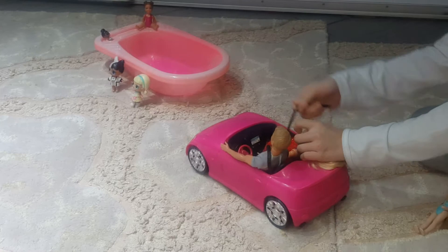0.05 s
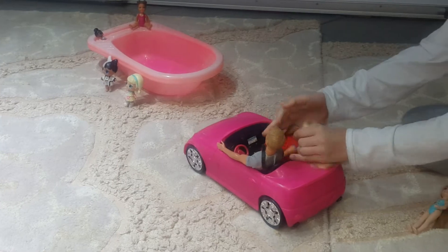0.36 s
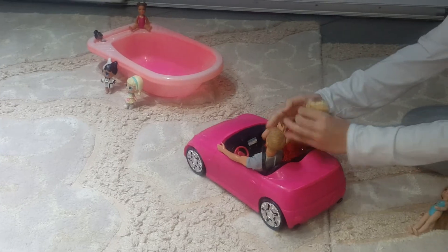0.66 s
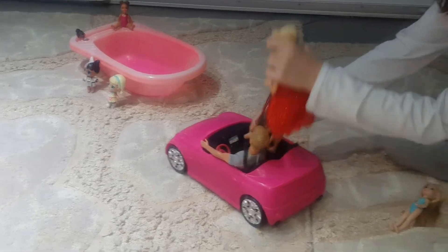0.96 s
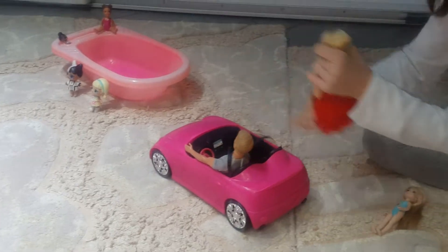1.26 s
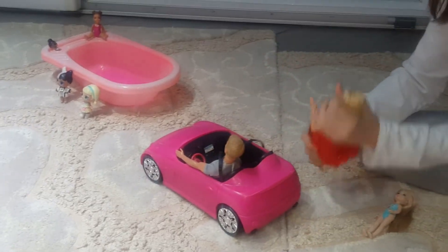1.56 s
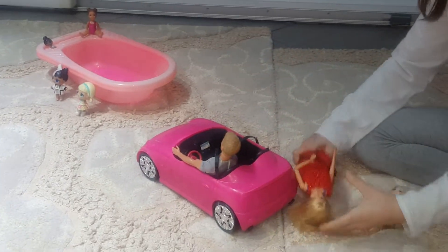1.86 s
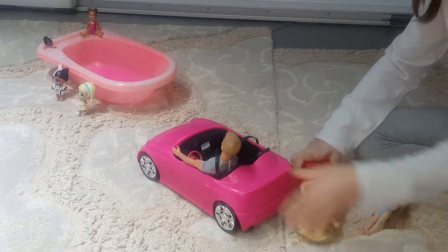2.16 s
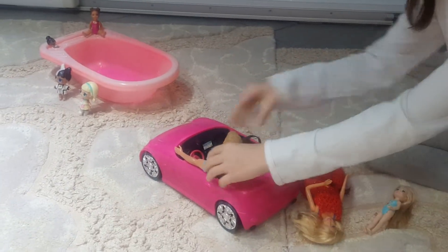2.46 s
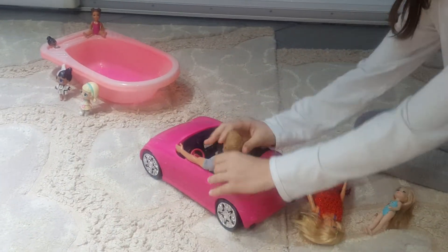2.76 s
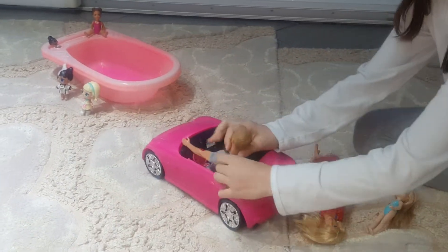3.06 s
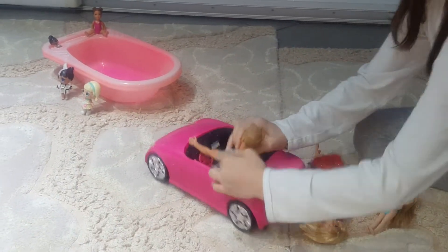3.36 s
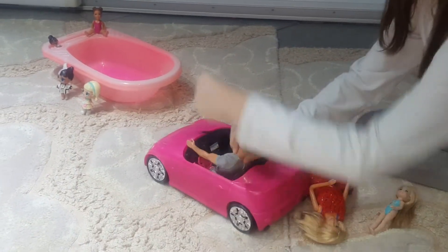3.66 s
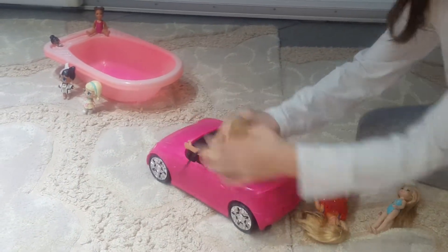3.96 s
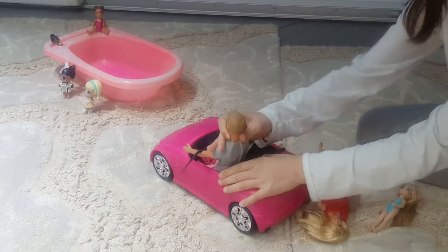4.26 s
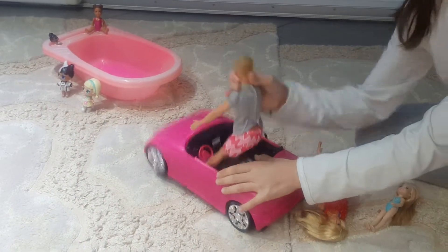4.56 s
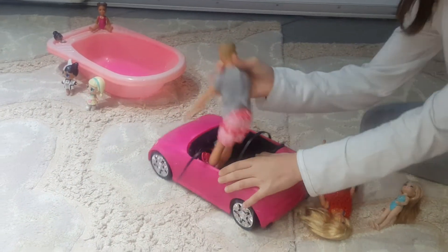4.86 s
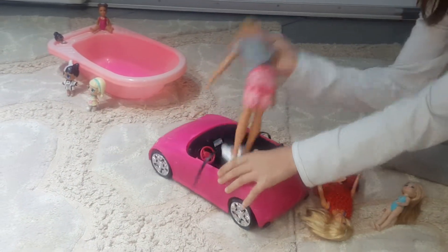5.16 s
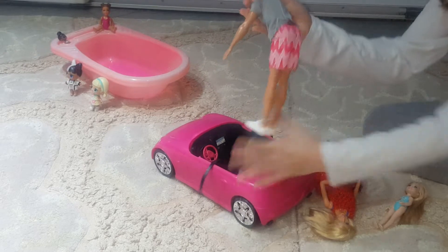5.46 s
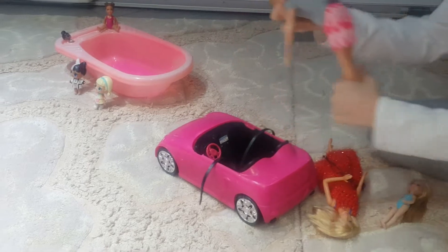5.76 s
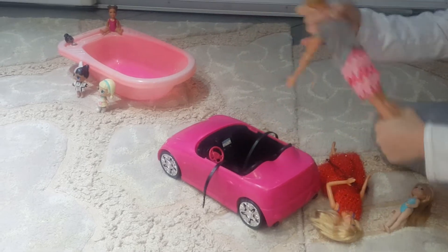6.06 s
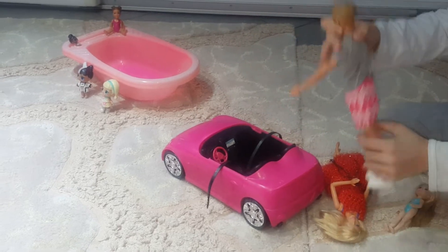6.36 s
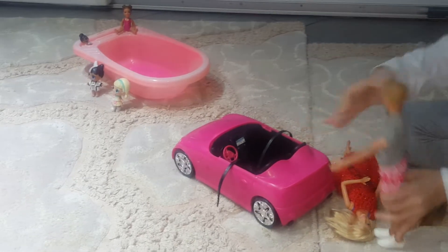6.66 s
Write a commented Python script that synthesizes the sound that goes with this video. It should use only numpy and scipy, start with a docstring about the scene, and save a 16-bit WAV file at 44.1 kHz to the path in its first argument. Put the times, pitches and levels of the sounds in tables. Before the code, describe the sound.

Plastic dolls knock, click and scrape against a hollow toy car as hands move them about in a small room.

```python
"""Stiff plastic dolls knock and clatter against a hollow toy car as they are lifted out of it.
Each impact excites damped modes of shell and limb; the harder the contact, the brighter the sound.
Joints and fingernails tick, one joint snaps, and friction makes plastic scrape and hair and sleeves
rustle. The car stands on a carpet in a small room that reflects the knocks; far behind, an appliance
hums with the slow beat of its motor against the mains."""
import sys
import numpy as np
from scipy import signal
from scipy.io import wavfile

SR = 44100
rng = np.random.default_rng(int(sys.argv[2]) if len(sys.argv) > 2 else 0)


def generate_wav(sig):
    """Save sig (samples, or channels by samples) to the path in sys.argv[1] as 16-bit PCM at SR."""
    pcm = np.round(np.clip(np.atleast_2d(sig).T, -1, 1) * 32767).astype(np.int16)
    wavfile.write(sys.argv[1], SR, pcm)


N = 295646
TIME = np.arange(N) / SR
RING = np.arange(SR // 15) / SR   # time axis of one impact [s]
CUTOFF_HZ = 15900

# strong modes of the car's shell: (frequency [Hz], level [dB])
SHELL_MODES = [(125, -10), (265, -6), (328, -13), (409, 0.5), (458, -7), (530, -7), (572, 1), (602, 3),
               (700, -4), (781, -1.5), (856, -20.5), (935, 3), (1073, -3), (1170, -6), (1291, -5),
               (1376, -5), (1520, -5), (1674, -5), (1776, -5.5), (1900, -5.5), (2055, -1.5), (2480, -2),
               (2637, -0.5), (2762, -9), (2900, -2.5), (3182, -23), (3494, -14.5)]
# registers of thud, shell, clack and click: (lower edge [Hz], decay time T60 [s], gain [dB])
MODE_REGISTERS = [(100.3, 0.11, -2), (480, 0.045, -0.1), (900, .028, 0.5), (2000, 0.021, 2.26)]
# big low panels set the whole body thudding: (panel frequency [Hz], level re shell [dB])
BODY_THUD = [(545, -4), (615, -10.5)]
# crowded upper modes, heard as a noisy snap: (frequency [Hz], spectral density [dB])
SNAP_SPECTRUM = [(3000, -9.5), (4300, 1), (5500, 6), (6800, -2.5), (8200, 1), (10000, -9), (13000, -3.5),
                 (16000, -11.5)]
# plastic sliding on plastic: (frequency [Hz], spectral density [dB])
SKID_SPECTRUM = [(900, -9.5), (1300, 6.5), (2000, 5.5), (3000, -0.5), (4500, -10.5), (6000, -20.5)]


def knocks(gain_db=-0.68, snap_db=-1.5, skid_db=-7.0, detune=0.029, focus_octaves=0.25):
    """Impact excitation: shell and limb ring; a soft contact is too slow to drive the high modes."""
    shell_hz, shell_mode_db = np.transpose(SHELL_MODES)
    upper_hz = np.geomspace(2200, 5000, 22)
    mode_hz = np.r_[shell_hz, upper_hz]
    mode_db = np.r_[shell_mode_db, at_hz([(2000, -8), (3400, -5), (5000, -8)], upper_hz)]
    register = np.digitize(mode_hz, [row[0] for row in MODE_REGISTERS[1:]])
    snap_noise, skid_noise = coloured(SNAP_SPECTRUM, size=SR), coloured(SKID_SPECTRUM, size=SR)
    out = np.zeros((2, N))
    for s, shell_db, limb_db, hardness, panel_hz in contacts():
        hz = mode_hz * (1 + detune * rng.standard_normal(len(mode_hz)))   # the grip shifts the modes
        limb_hz = max(3300 * 2 ** (hardness / 8), 1750)   # harder blows favour a higher limb resonance
        focus_db = sum(lift_db * np.exp(-(np.log2(hz / centre) / focus_octaves) ** 2)
                       for centre, lift_db in ((panel_hz, 7.0), (limb_hz, 4.0)))
        tilt_db = 0.54 * hardness * np.log2(np.maximum(hz / 1600, 1))   # acts above 1600 Hz
        db = mode_db + focus_db + tilt_db
        thud_db = shell_db + at_hz(BODY_THUD, panel_hz)
        clack_db = limb_db - hardness
        click_db = limb_db + 1.5 + 0.24 * hardness
        softness = np.clip((-hardness - 6.5) / 10, 0, 1)   # glancing touches build up slowly
        for k, level_db in enumerate((thud_db, shell_db, clack_db, click_db)):
            edge_hz, t60, register_db = MODE_REGISTERS[k]
            rise = 0.55 + 3.22 * softness * edge_hz / 1000
            ring = damped_modes(hz[register == k], db[register == k], t60, rise_cycles=rise)
            add(out, s, from_db(level_db + register_db) * ring)
        add(out, s, from_db(limb_db + hardness + snap_db) * snap(snap_noise))
        add(out, s, from_db((clack_db + click_db) / 2 + skid_db) * skid(skid_noise))
    return from_db(gain_db) * out


# a limb meets the car:
# (time [s], shell level [dB], limb level [dB], hardness as treble lift [dB], panel frequency [Hz])
IMPACTS = [(0.0316, -23.5, -36, -6, 743), (.057, -26, -35.5, -6.5, 686), (.0843, -26.5, -42.5, -6, 640),
           (0.357, -45, -63, -0.5, 640), (.457, -57, -50.5, -10.5, 900), (0.4814, -48, -45, -4, 580),
           (0.8636, -32, -38.5, -6.5, 900), (0.9069, -38, -49, -4, 590), (0.9208, -30.5, -42.5, -1, 620),
           (1.0785, -53, -64.5, -7, 596), (1.116, -46.5, -69.5, -10, 560), (1.9387, -32.5, -52, -8, 580),
           (2.6287, -48, -65, -13, 554), (2.7341, -40.5, -57, -13, 680), (2.829, -43.5, -58.5, -4, 604),
           (2.9727, -48, -56, -11.5, 810), (3.178, -49.5, -68.5, -13, 780), (3.336, -45, -64.5, -11, 560),
           (3.4556, -30.5, -44.5, -4, 483), (3.462, -31, -49, -11.5, 540), (3.5375, -36.5, -41, -5, 555),
           (3.574, -41.5, -46, 3, 575), (3.657, -40.5, -65.5, -15.5, 620), (3.6986, -44, -55, -11, 710),
           (3.7211, -34, -40.5, -6, 640), (3.8853, -36, -49, -8.5, 670), (4.0194, -35.5, -47, -7, 606),
           (4.062, -37, -61.5, -14.5, 560), (4.338, -42.5, -60, -14.5, 579),
           (4.3621, -48.5, -53.5, -5.5, 520), (4.538, -24, -27.5, 0.5, 620), (4.5445, -29.5, -35, 1, 540),
           (4.560, -22, -38.5, -10, 560), (4.593, -24, -25.5, -3.5, 900), (4.605, -32, -27, -1.5, 550),
           (4.6225, -24, -30, 3.5, 587), (4.629, -22, -33.5, -9.5, 565), (4.657, -33, -51, 7, 604),
           (4.837, -44, -44.5, -0.5, 613), (4.9523, -41, -44.5, -10, 900), (4.9748, -33, -44, -10, 620),
           (4.991, -32, -41.5, -2, 910), (5.023, -48, -49, -5.5, 555), (5.1439, -51, -49.5, -10, 556),
           (5.163, -34.5, -39, -4, 545), (5.2061, -31, -35.5, -1.5, 630), (5.3643, -50, -55.5, 0, 610)]


def contacts(rebound_s=.007, spread=0.3005):
    """Inelastic collision: each limb lands, then lands again, weaker and softer."""
    delays = rebound_s * (1 + spread * rng.uniform(-1.002, 1, len(IMPACTS)))
    for (s, shell_db, limb_db, hardness, panel_hz), delay in zip(IMPACTS, delays):
        yield s, shell_db, limb_db, hardness, panel_hz
        yield s + delay, shell_db - 12, limb_db - 10, hardness - 1.5, panel_hz


def damped_modes(hz, level_db, t60, scatter_db=3.0, apart_hz=4500, rise_cycles=0.65):
    """Modal superposition: one blow starts decaying sinusoids, each with its own strength."""
    strength, split, sign = rng.standard_normal((3, len(hz), 1))
    hz = hz[:, None]
    # short waves reach the two sides out of step
    phase = np.minimum(hz / apart_hz, 1) * split * np.array([1, -1])[:, None, None]
    amplitude = np.sign(sign) * from_db(level_db[:, None] + scatter_db * strength)
    waves = amplitude * np.sin(2 * np.pi * hz * RING + phase)
    onset = 1 - np.exp(-(RING * hz.mean() / rise_cycles) ** 2)   # low registers build up more slowly
    return unit_attack(waves.sum(1) * onset * decay(t60))


def snap(noise, t60=0.039, spike=1.2, spike_s=0.00051):
    """Modal overlap: crowded high modes merge into noise, with a spike at the instant of contact."""
    return burst(noise, decay(t60) + spike * np.exp(-RING / spike_s))


def skid(noise, length_s=.016, slip_s=0.0021, count=6):
    """Stick-slip friction: the limb skids on in tiny slips, each weaker the later it comes."""
    slips = rng.uniform(0, length_s, (count, 1))
    since = RING - slips
    pulses = (since > 0) * np.exp(-np.abs(since) / slip_s - slips / length_s)
    return burst(noise, pulses.sum(0))


# modes of a doll's limb: (frequency [Hz], level [dB])
LIMB_MODES = [(600, -9), (930, -9.5), (1500, -17), (2185, 0.5), (2320, -1.5), (2425, -20), (2950, -22),
              (3400, -10), (3790, -13), (4050, -2), (4720, -4.5), (5195, -9), (6100, -20), (6820, -16),
              (8150, -12)]
# the crack of its joint: (frequency [Hz], spectral density [dB])
CRACK_SPECTRUM = [(700, -19), (1500, -14), (2500, 3.5), (4500, -5.5), (8000, -3), (11000, -19),
                  (15000, -31)]


def joint(s=1.327, level_db=-36, crack_db=-1.0, rebound_s=.006, rebound_db=-8):
    """Elastic release: a stiff joint snaps over and rebounds, ringing a limb that the hand damps."""
    out = np.zeros((2, N))
    hz, db = np.transpose(LIMB_MODES)
    noise = coloured(CRACK_SPECTRUM, size=SR)
    for delay, loss_db in ((0, 0), (rebound_s, rebound_db)):
        ring = damped_modes(hz, db, t60=0.02, scatter_db=0.0)
        crack = from_db(crack_db) * burst(noise, decay(t60=0.011))
        add(out, s + delay, from_db(level_db + loss_db) * (ring + crack))
    return out


# ticks of joints and fingernails: (time [s], level [dB], centre frequency [Hz])
SMALL_TICKS = [(1.435, -52, 2980), (1.443, -56.5, 6850), (1.574, -54.5, 3160), (1.658, -56.5, 2700),
               (3.849, -54.5, 4970), (4.414, -58, 9000), (4.448, -57.5, 8850), (5.040, -51, 5600),
               (5.119, -46.5, 9500), (5.408, -60, 2960), (5.441, -57, 3530), (5.870, -63.5, 8950),
               (6.602, -64.5, 8900)]


def ticks(t60=0.0074, gain_db=-4, edge_ratio=1.64, faint_per_s=1.5, faint_db=-69, faint_hz=(2980, 10000)):
    """Damped resonance: small stiff parts give a tiny burst in one broad band, faint ones at random."""
    out = np.zeros((2, N))
    chance = rng.random((round(faint_per_s * N / SR), 2))
    faint = [(when * N / SR, faint_db, np.interp(pitch, [0, 1], faint_hz)) for when, pitch in chance]
    for s, level_db, centre_hz in SMALL_TICKS + faint:
        pulse = rng.standard_normal((2, len(RING))) * decay(t60)
        tick = band_pass(pulse, centre_hz / edge_ratio, min(centre_hz * edge_ratio, CUTOFF_HZ))
        add(out, s, from_db(level_db + gain_db) * unit_attack(tick))
    return out


# limbs slip along the shell: (time [s], half-width [s], level [dB])
LIMB_SCRAPES = [(.858, 0.0076, -48), (.895, .015, -57), (4.014, 0.0082, -53), (4.075, .02, -51),
                (4.345, 0.02, -58), (4.988, 0.015, -37), (5.108, 0.022, -51)]


def scrapes(judder_db=2.5):
    """Stick-slip friction: plastic drags over plastic in quick, uneven catches."""
    judder = from_db(judder_db * (drift(700) - 0.5))
    return swells(LIMB_SCRAPES) * judder * coloured(SKID_SPECTRUM)


# hands grip, tug or drag a toy: (start [s], duration [s], rubbing level [dB], brushing level [dB])
HAND_GRIPS = [(0.03, 0.48, -57, -71), (0.8, .42, -55, -81), (2.582, 0.5, -54.5, -66), (3.37, 1.0, -51, -63),
              (3.563, 0.1, -58, -52.5), (4.576, 0.48, -52, -65), (5.047, 0.14, -40.5, -72),
              (5.344, 0.085, -52.5, -59)]
RESTING_RUB_DB, RESTING_BRUSH_DB = -57, -66.5   # the hands are never quite still


def effort(attack_s=0.027, release_s=0.094):
    """Incoherent addition: the powers of grips and resting hands sum to rubbing and brushing levels."""
    power = from_db([[RESTING_RUB_DB], [RESTING_BRUSH_DB]]) ** 2
    for s, length, rub_db, brush_db in HAND_GRIPS:
        attack = np.clip((TIME - s) / attack_s, 0, 1)
        release = np.exp(-np.maximum(TIME - s - length, 0) / release_s)
        power = power + (from_db([[rub_db], [brush_db]]) * attack * release) ** 2
    return 10 * np.log10(power)


# skin on shell, hair and cloth, finger on doll, carpet: (frequency [Hz], spectral density [dB])
RUB_SPECTRUM = [(200, -32.5), (400, -8.5), (590, 3), (900, -11.5), (1500, -14.5), (3000, -27.5)]
CLOTH_SPECTRUM = [(900, -4.5), (1600, 10.5), (2800, 2), (5000, -7), (8000, -2.5), (11000, -15.5),
                  (16000, 0)]
FINGER_SPECTRUM = [(1500, -5), (2300, 6), (2900, -11), (3700, -7), (8000, -14), (12000, -22)]
CARPET_SPECTRUM = [(60, -6), (90, -4), (125, 1), (170, -8), (230, -3.5)]
# fingers slide over a doll: (time [s], half-width [s], level [dB])
FINGER_SLIDES = [(0.862, 0.063, -59.5), (2.922, 0.004, -61), (3.183, 0.081, -67), (5.80, 0.075, -67.5),
                 (6.128, 0.035, -59.5), (6.347, 0.039, -73)]
# the car rocks or a hand comes down on the carpet: (time [s], half-width [s], level [dB])
CARPET_BUMPS = [(2.39, 0.042, -63), (4.60, 0.06, -41), (5.19, .04, -70)]


def handling(rub_db=-3.5, cloth_db=-7.5, rub_rough_db=1.0, brush_rough_db=2.5):
    """Friction noise: skin, hair and sleeves catch unevenly, while the carpet cushions dull bumps."""
    rubbing_db, brushing_db = effort()
    rubbing = from_db(rubbing_db + rub_db + rub_rough_db * drift(42)) * coloured(RUB_SPECTRUM)
    cloth = from_db(brushing_db + cloth_db) * coloured(CLOTH_SPECTRUM)
    fingers = swells(FINGER_SLIDES) * coloured(FINGER_SPECTRUM)
    catches = from_db(brush_rough_db * drift(160))
    bumps = swells(CARPET_BUMPS) * coloured(CARPET_SPECTRUM)
    return rubbing + (cloth + fingers) * catches + bumps


# near walls and furniture: (left delay [s], right delay [s], level [dB])
REFLECTIONS = [(.0056, .0057, -12), (.0103, .0101, -14)]


def early_echoes(x):
    """Specular reflection: each close surface returns a blow once, at a different delay on each side."""
    out = np.zeros((2, N))
    for *delays, db in REFLECTIONS:
        for side, delay in enumerate(delays):
            out[side] += from_db(db) * np.interp(TIME - delay, TIME, x[side], left=0)
    return out


# reverberation time: (frequency [Hz], T60 [s])
REVERB_T60 = [(100, 0.52), (250, 0.47), (550, 0.3), (1400, 0.28), (3700, 0.31), (9000, 0.26), (15000, .2)]
# strength of the diffuse field: (frequency [Hz], level re direct sound [dB])
REVERB_LEVEL = [(100, -14.5), (300, -2), (600, 0), (1400, -4.5), (4000, -7), (9000, -7), (15000, -13.5)]


def reverberation(x, onset_s=0.0034):
    """Diffuse field: dense echoes set in after a few milliseconds and decay band by band."""
    t = TIME[:SR * 3 // 5]
    onset = np.clip(t / onset_s - .5, 0, 1)
    response = 0
    for hz, band in noise_bands(len(t)):
        fade = onset * decay(at_hz(REVERB_T60, hz), t)
        response += from_db(at_hz(REVERB_LEVEL, hz)) * band * fade / np.sqrt(np.sum(fade ** 2))
    return signal.fftconvolve(x, response, axes=1)[:, :N]


# mains buzz, a motor just under it and a deeper tone: (frequency [Hz], level [dB])
HUM_TONES = [(99.96, -56.8), (98.27, -60.9), (47.5, -67)]


def appliance_hum(in_phase_s=.1):
    """Beats: the hum swells whenever mains and motor fall into step."""
    t = TIME - in_phase_s
    return sum(from_db(db) * np.sqrt(2) * np.cos(2 * np.pi * hz * t) for hz, db in HUM_TONES)


# low rumble and room air: (frequency [Hz], spectral density [dB])
RUMBLE_SPECTRUM = [(50, -19.5), (80, -9.5), (140, 1.5), (185, -11.5), (240, 6.5), (300, 0), (370, -23.5),
                   (500, -31.5)]
AIR_SPECTRUM = [(15, -35), (25, -2), (48, -7.5), (102, -2.5), (170, -7), (242, 3.5), (439, -43.5),
                (591, 1.5), (714, -22.5), (1230, -9.5), (1370, -34), (2410, -23.5), (6740, -34.5),
                (14800, -36.5), (16000, -46)]


def ambience(air_db=-59.0, resting_rumble_db=-55.5, rumble_share=0.4):
    """Noise floor: steady room air and a low rumble that grows as the hands work."""
    rumble_db = resting_rumble_db + rumble_share * (effort()[0] - RESTING_RUB_DB)
    return from_db(rumble_db) * coloured(RUMBLE_SPECTRUM) + from_db(air_db) * coloured(AIR_SPECTRUM)


# likeness of the two sides: (frequency [Hz], left-right correlation [1])
COHERENCE = [(100, 0.92), (300, 0.94), (700, 0.68), (1500, 0.14), (4000, 0.15), (15000, 0.049)]


def noise_bands(size, low_hz=0, high_hz=np.inf):
    """Spatial coherence: yield (Hz, stereo noise band), the two sides alike in the bass only."""
    edges = np.geomspace(25, 17000, 23)
    white = rng.standard_normal((2, 2, size + SR // 10))
    for k, (low, high) in enumerate(zip(edges, edges[1:])):
        hz = np.sqrt(low * high)
        if low_hz < hz < high_hz:
            mid, side = band_pass(white[k % 2], low, high)[:, -size:]
            alike = at_hz(COHERENCE, hz)
            mid, side = np.sqrt((1 + alike) / 2) * mid, np.sqrt((1 - alike) / 2) * side
            yield hz, np.array([mid + side, mid - side])


def coloured(spectrum, size=N):
    """Spectral shaping: weighted bands sum to stereo noise of unit power."""
    bands = noise_bands(size, spectrum[0][0] / np.sqrt(2), spectrum[-1][0] * np.sqrt(2))
    return unit_power(sum(from_db(at_hz(spectrum, hz)) * band for hz, band in bands))


def burst(noise, envelope):
    """Gating: a random stretch of noise under a short envelope."""
    start = rng.integers(noise.shape[1] - len(RING))
    return unit_attack(noise[:, start:start + len(RING)] * envelope)


def swells(rows):
    """Gaussian envelopes from (time [s], half-width [s], level [dB])."""
    return sum(from_db(db) * np.exp(-((TIME - s) / width) ** 2) for s, width, db in rows)


def drift(rate_hz):
    """Random modulation of unit power."""
    knots = rng.standard_normal(4096)
    return unit_power(np.interp(TIME * rate_hz, np.arange(len(knots)), knots))


def decay(t60, t=RING):
    """Exponential damping: 60 dB in t60 seconds."""
    return from_db(-60 * t / t60)


def band_pass(x, low_hz, high_hz):
    """Filter to one band."""
    return signal.sosfilt(signal.butter(2, [low_hz, high_hz], "band", fs=SR, output="sos"), x)


def from_db(db):
    """Decibels to amplitude."""
    return 10 ** (np.asarray(db) / 20)


def unit_power(x):
    """Normalise the mean square."""
    return x / np.sqrt(np.mean(x ** 2) + 1e-20)


def unit_attack(x):
    """Normalise to the mean square of the first 12 ms."""
    return x / np.sqrt(np.mean(x[:, :SR // 83] ** 2) + 1e-20)


def at_hz(points, hz):
    """Interpolate on a log-frequency axis."""
    known_hz, values = np.transpose(points)
    return np.interp(np.log(hz), np.log(known_hz), values)


def add(track, s, sound):
    """Superpose a short sound at time s."""
    i = max(round(s * SR), 0)
    track[:, i:i + sound.shape[1]] += sound[:, :N - i]


def scene(left_db=0.7):
    """Superposition of toys, echoes, hands and background, a little louder on the left."""
    toys = knocks() + joint() + ticks() + scrapes()
    mix = toys + early_echoes(toys) + reverberation(toys) + handling() + appliance_hum() + ambience()
    return mix * from_db([[left_db], [-left_db]])


def record(dry, ceiling=.8):
    """Saturation rounds the loudest peaks; band limiting removes the deepest bass and the very top."""
    rounded = ceiling * np.tanh(dry / ceiling)
    trimmed = signal.sosfilt(signal.butter(2, 32, "high", fs=SR, output="sos"), rounded)
    return signal.sosfilt(signal.ellip(10, .3, 80, CUTOFF_HZ, fs=SR, output="sos"), trimmed)


dry = scene()
out = record(dry)
generate_wav(out)
```